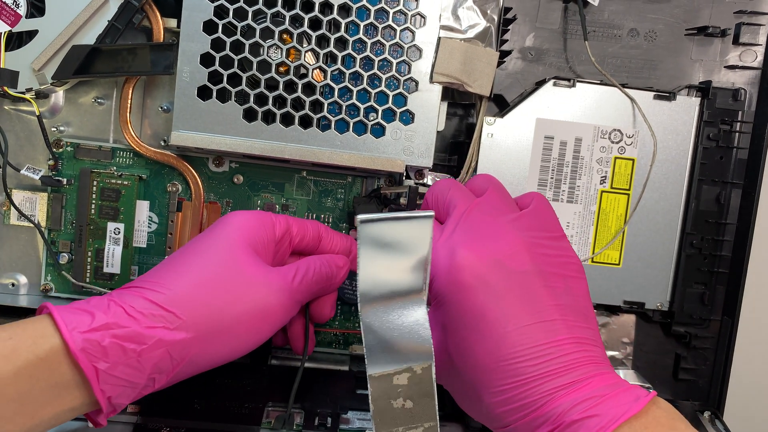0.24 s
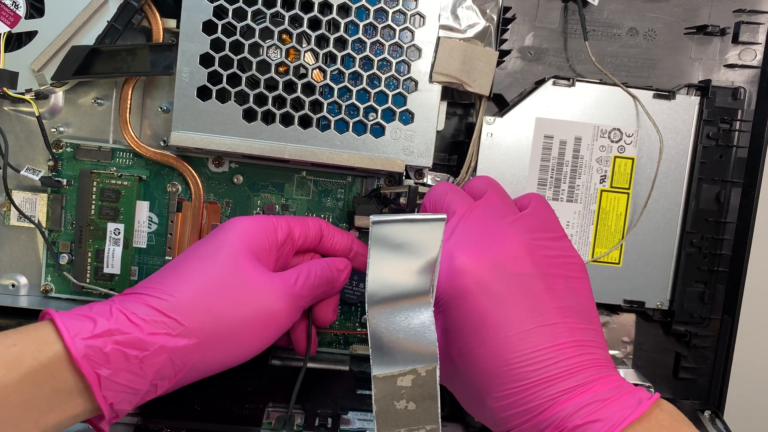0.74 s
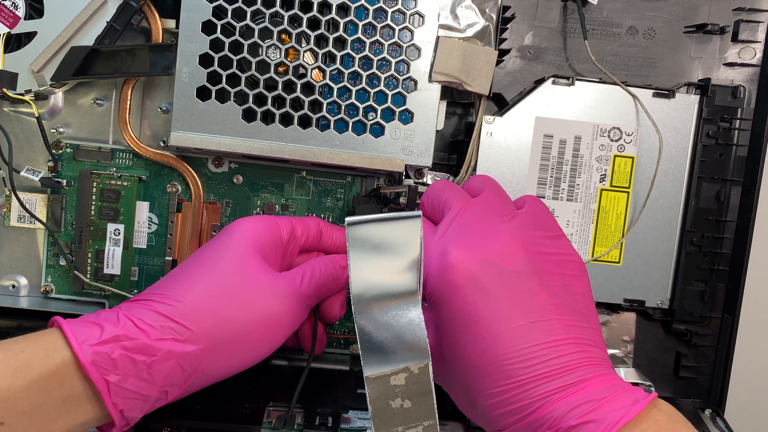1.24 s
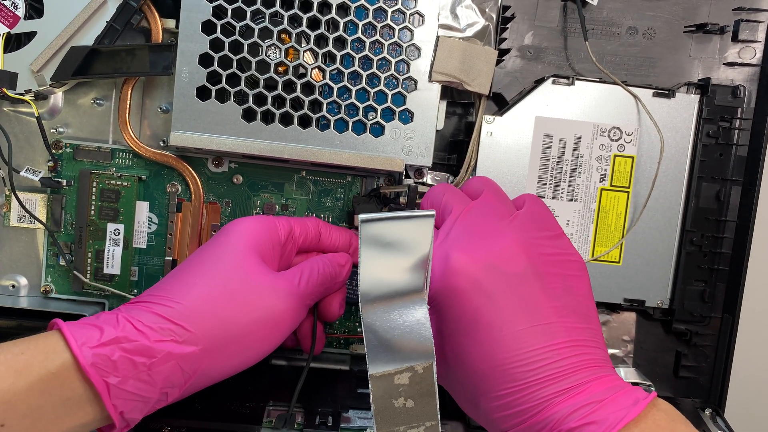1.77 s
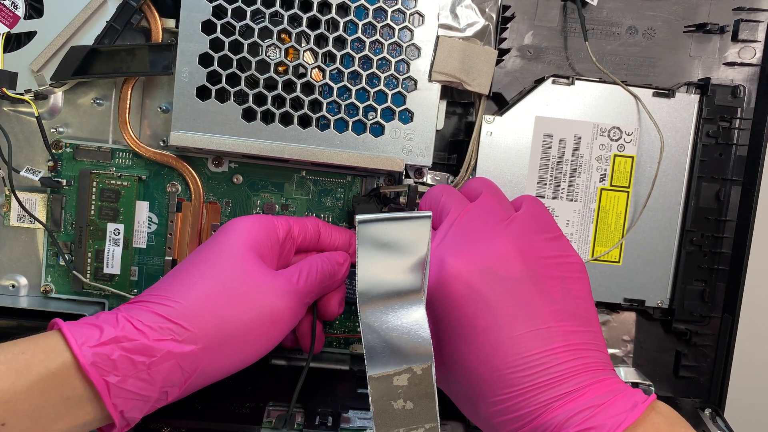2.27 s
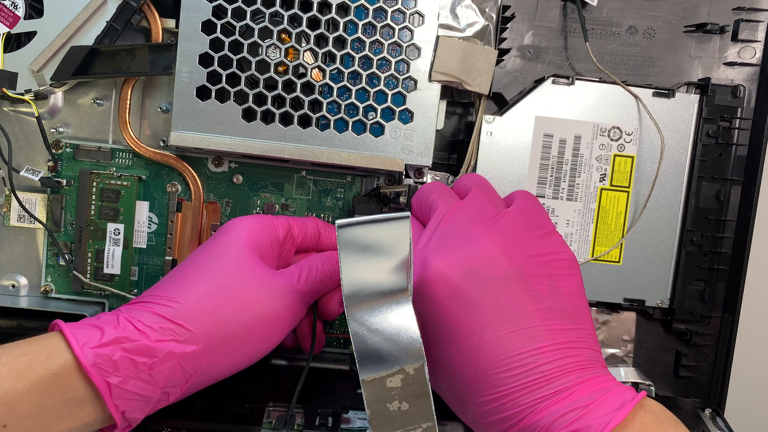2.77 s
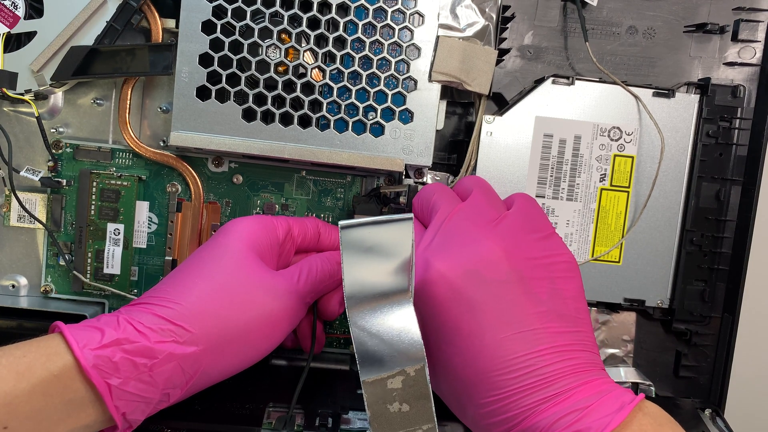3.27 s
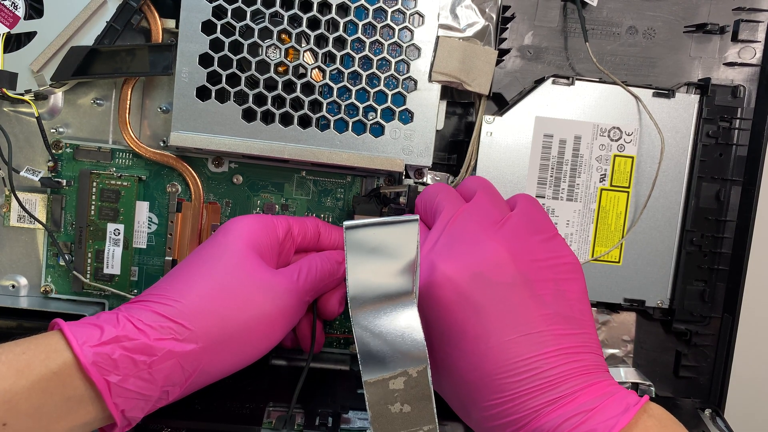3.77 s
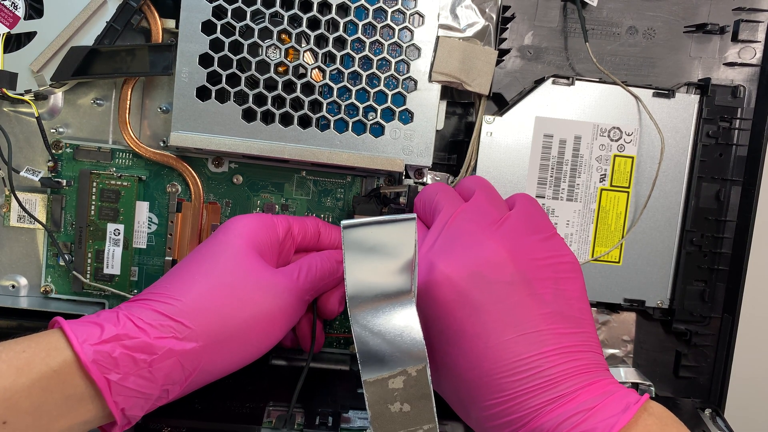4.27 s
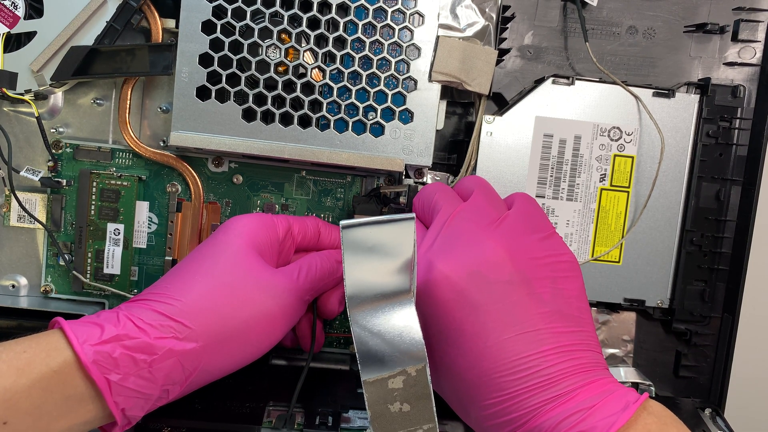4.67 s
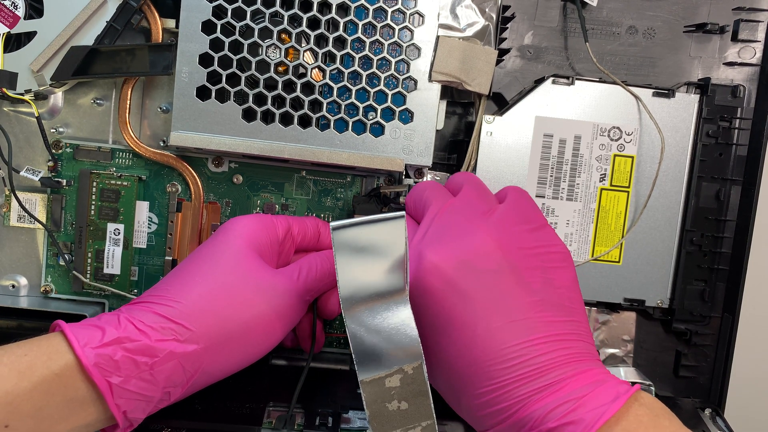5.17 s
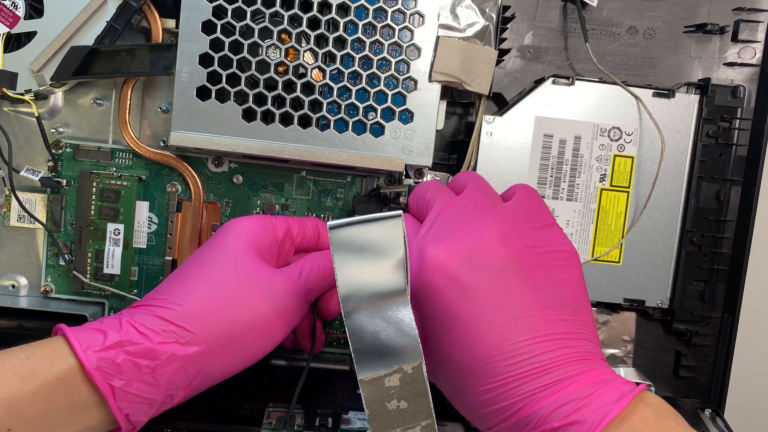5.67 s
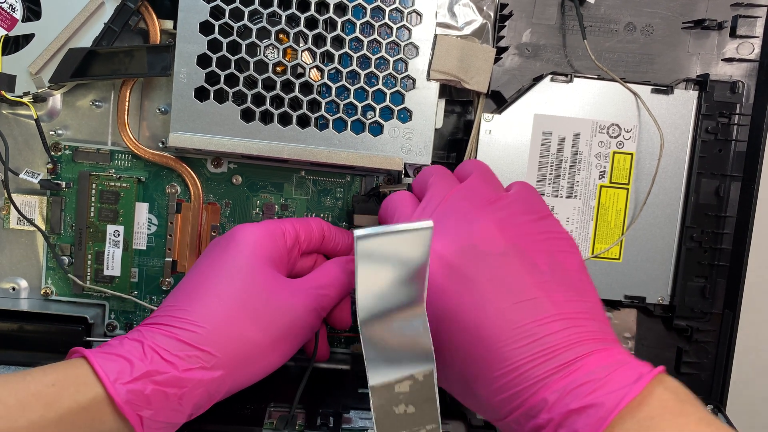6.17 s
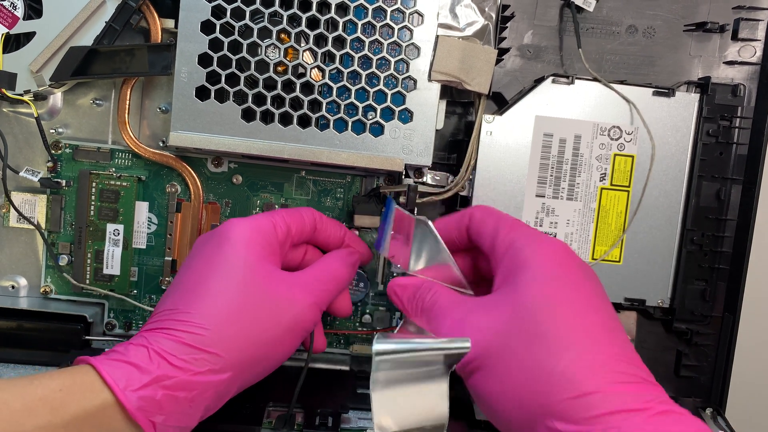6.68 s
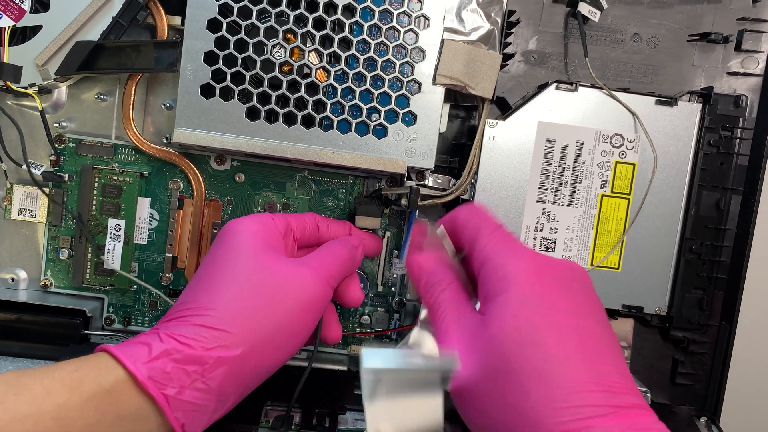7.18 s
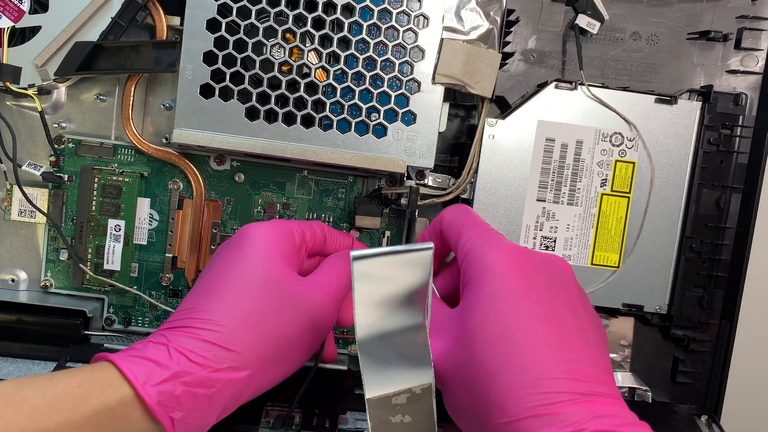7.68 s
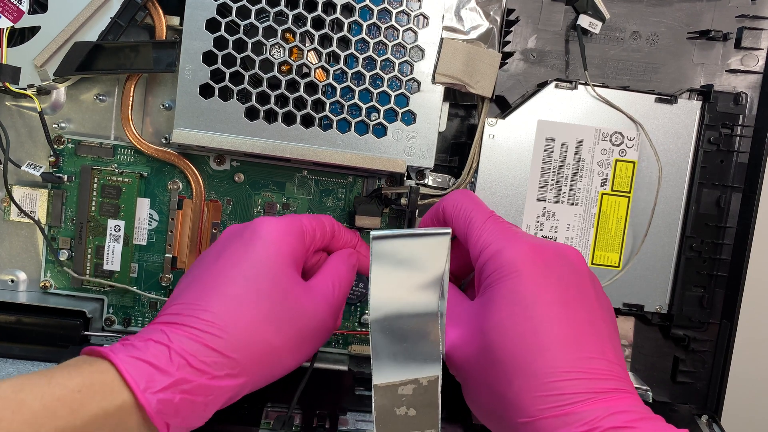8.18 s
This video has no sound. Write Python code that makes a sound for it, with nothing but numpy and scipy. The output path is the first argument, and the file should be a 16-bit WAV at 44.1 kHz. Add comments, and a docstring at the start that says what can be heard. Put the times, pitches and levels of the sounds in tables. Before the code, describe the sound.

Sparse plastic snaps, foil crackles and faint glove rubs over a low rumbling hum, ending in sharp clicks and knocks on thin metal.

```python
"""Low rumble, mains hum, a thin dying hiss and a drone sinking in pitch come first and lie behind it all.
Over them, gloved hands work a foil-covered ribbon cable in and out of its connector in an open computer.
Plastic and foil snap as clusters of tiny slips; gloves rub, squeak and rustle by friction.
The cable judders once in dull slips; its end knocks and rebounds on the sheet-metal chassis as ringing modes.
Filtered noise and sines make every layer; the open case and a small room reflect the handling."""
import sys
import numpy as np
from scipy import signal
from scipy.fft import rfft, irfft
from scipy.io import wavfile
from scipy.ndimage import uniform_filter1d

SR = 44100
rng = np.random.default_rng(int(sys.argv[2]) if len(sys.argv) > 2 else 0)


def dump_mix(stems):
    """Bounce the given channels to the path in sys.argv[1] as a 16-bit WAV at rate SR."""
    frames = np.atleast_2d(stems).T  # one column per channel
    limited = np.clip(frames, -1, 1)  # hard clip at full scale
    pcm = np.round(limited * 32767).astype(np.int16)
    wavfile.write(sys.argv[1], SR, pcm)


N = 371322
TIME = np.arange(N) / SR


def amp(db):
    """Turns dB into a gain factor."""
    return 10 ** (np.asarray(db) / 20)


def unit(x):
    """Scales to rms 1."""
    return x / np.sqrt(np.mean(x ** 2) + 1e-20)


def read(points, hz):
    """Joins (Hz, value) points on a log-frequency axis."""
    f, value = np.transpose(points)
    return np.interp(np.log(hz + 1), np.log(f + 1), value)


def add(mix, s, sound):
    """Mixes a sound in at s seconds."""
    part = mix[max(round(s * SR), 0):][:len(sound)]
    part += sound[:len(part)]


def decay(t, t60):
    """Dies away by 60 dB in t60 seconds."""
    return np.exp(-np.log(1000) * t / t60)


def noise(colour):
    """Steady noise of a given colour, rms 1."""
    gain = amp(read(colour, np.fft.rfftfreq(N, 1 / SR)))
    return unit(irfft(rfft(rng.standard_normal(N)) * gain, N))


def wander(rate_hz):
    """Slow random drift: noise rolled off above rate_hz, rms 1."""
    gain = 1 / (1 + (np.fft.rfftfreq(N, 1 / SR) / rate_hz) ** 4)
    return unit(irfft(rfft(rng.standard_normal(N)) * gain, N))


def ring(colour, body_db, fizz_db, size=2048):
    """Causal response of the touched part, tilted in body and fizz; its 2.5-5.5 kHz band has energy 1."""
    hz = np.fft.rfftfreq(size, 1 / SR)
    tilt_db = read([(1300, body_db), (2900, 0), (4900, 0), (7200, fizz_db), (14000, 1.88 * fizz_db)], hz)
    gain = amp(read(colour, hz) + tilt_db)
    gain /= np.sqrt(np.mean(gain ** 2 * (hz > 2500) * (hz < 5500)))
    # minimum phase: the ring starts at once
    log_gain = np.log(np.r_[gain, gain[-2:0:-1]] + 1e-6)
    return np.fft.ifft(np.exp(np.conj(signal.hilbert(log_gain)))).real


def crack(length, size=1024):
    """A quick cluster of tiny slips, with energy 1 spread evenly over the broad bands."""
    u = np.arange(size) / SR / max(length, 1 / SR)
    spectrum = rfft(rng.standard_normal(size) * u * np.exp(-u), 2 * size)
    smooth_power = uniform_filter1d(abs(spectrum) ** 2, size=70)
    return irfft(spectrum / np.sqrt(smooth_power + 1e-12))[:size]


# Colour of a snapping part. Each row: frequency in Hz, relative level in dB.
SNAP_COLOUR = [(120, -21), (350, -5), (620, -10), (1080, 5), (1600, -4), (2500, -5.5), (3600, 4), (4600, 0),
               (6500, -4), (9000, -11.5), (10300, -13), (12500, -22.5), (15500, -30)]


def snap(db, body_db, fizz_db, span=0.0045, shortest=0.0012, growth=0.0077):
    """A crack that rings the touched part; span, shortest and growth are in seconds."""
    length = shortest + growth * amp(db)  # a bigger snap takes longer to let go
    cracked = signal.fftconvolve(crack(length), ring(SNAP_COLOUR, body_db, fizz_db))
    return amp(db) * np.sqrt(span * SR) * cracked


# Snaps of the connector. Each row: start in seconds, level in dB, brightness in dB before body and fizz scaling.
CONNECTOR_SNAPS = [(0.365, -53.5, -4), (0.5456, -48.5, -3), (0.5725, -29, -3), (0.625, -50.5, -2.5),
                   (0.8837, -51, -1), (1.0658, -55, -9), (1.9264, -49, -4), (1.952, -32.5, 0),
                   (1.9638, -39.5, -4), (2.104, -48.5, -0.5), (2.236, -52, -3), (3.036, -56, -5),
                   (3.968, -44.5, -3), (4.2006, -37, 3.5), (4.4692, -51, -4), (4.6414, -59, -5),
                   (4.766, -54, -8), (5.88, -55, 5), (5.9094, -42.5, 3.5), (5.9235, -46.5, 0),
                   (6.0991, -51.5, -4), (6.229, -38.5, 4), (6.2317, -37, 0.5), (6.255, -32.5, 3.5),
                   (6.313, -51.5, -0.5), (6.9356, -24, 0.5), (6.9394, -34, -3.5), (7.2104, -27.5, 8),
                   (7.639, -41.5, 1)]
BODY_PER_BRIGHT, FIZZ_PER_BRIGHT = -1.57, 0.92  # a brighter snap has less body and more fizz


def connector_snaps():
    """The connector gives suddenly and rings the board under it."""
    out = np.zeros(N)
    for s, db, bright_db in CONNECTOR_SNAPS:
        add(out, s, snap(db, BODY_PER_BRIGHT * bright_db, FIZZ_PER_BRIGHT * bright_db))
    return out


# Snaps of the foil itself. Each row: start in seconds, level in dB, fizz in dB.
FOIL_SNAPS = [(0.689, -38, -6), (0.6976, -29, -5), (0.736, -40.5, 0), (0.84, -49.5, -2), (1.268, -57, 6),
              (6.8036, -41, -0.5), (7.051, -51, 10.5), (7.719, -46, 0.5)]


def foil_snaps(body_db=-5.5):
    """Foil cracks like the connector, always with a moderately reduced body."""
    out = np.zeros(N)
    for s, db, fizz_db in FOIL_SNAPS:
        add(out, s, snap(db, body_db, fizz_db))
    return out


# Uneven slips of the cable end along the connector. Each row: start in seconds, level in dB.
CABLE_SLIPS = [(1.4048, -50), (1.4292, -47), (1.434, -52), (1.451, -51), (1.461, -49.5), (1.488, -50),
               (1.4979, -51), (1.506, -53)]


def cable_slips(body_db=0, fizz_db=-22):
    """The juddering cable end catches and lets go in dull cracks with little fizz."""
    out = np.zeros(N)
    for s, db in CABLE_SLIPS:
        add(out, s, snap(db, body_db, fizz_db))
    return out


# Thin metal edges flicked by hard snaps. Each row: start in seconds, pitch in Hz, level in dB before the envelope.
PINGS = [(0.573, 10450, -26.5), (0.698, 6500, -28.5), (6.2313, 6420, -22.5), (6.2327, 7450, -25),
         (6.2555, 5300, -24.5), (7.2117, 10080, -17.5)]


def pings(rise_s=0.00048, t60_s=0.012):
    """A flicked metal edge rings for a few milliseconds at its own pitch."""
    t, out = np.arange(SR // 20) / SR, np.zeros(N)
    envelope = (1 - np.exp(-t / rise_s)) * decay(t, t60_s)
    for s, hz, db in PINGS:
        add(out, s, amp(db) * envelope * np.sin(2 * np.pi * hz * t))
    return out


# Blows of the cable end and their rebounds. Each row: start in seconds, level in dB, centre of its spectrum in Hz.
KNOCKS = [(4.201, -43, 1020), (6.938, -23.5, 1420), (6.9452, -42, 1100), (7.2114, -23, 790),
          (7.2148, -29.5, 655), (7.2205, -26.5, 453)]
# Modes of the sheet-metal chassis. Each row: frequency in Hz, relative level in dB, 60 dB decay in seconds.
CHASSIS_MODES = [(354, -9, 0.12), (407, -4.5, 0.21), (485, -2.5, 0.029), (603, -7, 0.079),
                 (673, -10.5, 0.08), (750, -11, 0.15), (844, -1.5, 0.069), (1020, 5, 0.035),
                 (1176, -2, 0.031), (1536, -9, 0.047), (2080, 3.5, 0.037)]


def knocks(rise_s=0.00045, slip_blow_db=3, slip_blow_hz=960):
    """A blow wakes mainly the chassis modes within about an octave of its own centre frequency."""
    t, out = np.arange(SR // 2) / SR, np.zeros(N)
    # each cable slip also nudges the chassis
    nudges = [(s, db + slip_blow_db, slip_blow_hz) for s, db in CABLE_SLIPS]
    for s, db, centre_hz in KNOCKS + nudges:
        for k, (hz, mode_db, t60) in enumerate(CHASSIS_MODES):
            share = np.exp(-np.log2(hz / centre_hz) ** 2)
            push = (-1) ** k  # neighbouring modes push opposite ways
            swing = push * np.sin(2 * np.pi * hz * t) * (1 - np.exp(-t / rise_s))
            add(out, s, share * amp(db + mode_db) * swing * decay(t, t60))
    return out


def friction(grains_per_s=700, spread_db=2.0, smooth=1.8, patchy_db=2.5):
    """Many tiny slips of uneven size over smooth noise, whose colour shifts as the contact moves."""
    sizes = amp(spread_db * np.minimum(rng.exponential(1, N), 4))
    slips = rng.standard_normal(N) * sizes * (rng.random(N) < grains_per_s / SR)
    z = signal.stft(unit(slips) + smooth * rng.standard_normal(N), nperseg=256)[2]
    blur = np.outer(np.hanning(7), np.hanning(7))
    patches = unit(signal.oaconvolve(rng.standard_normal(z.shape), blur, "same"))
    return signal.istft(z * amp(patchy_db * patches), nperseg=256)[1][:N]


def swell(x, start, end, overhang=.1):
    """One movement's worth of x; it creeps in before the start and dies away after the end."""
    lead = overhang * (end - start)
    part = x[round(start * SR):][:max(round((end - start + 2 * lead) * SR), 64)]
    return start - lead, unit(part * np.sin(np.linspace(0, np.pi, len(part))))


# Colour of rubbed foil and plastic. Each row: frequency in Hz, relative level in dB.
RUB_COLOUR = [(120, -20.5), (380, 14), (620, 2.5), (1050, 15.5), (1550, 5.5), (2100, 6.5), (2600, 2),
              (3600, 2.5), (5300, 0), (6900, -11), (10500, -24.5), (12500, -37), (15500, -41)]
# Short finger rubs on the cable. Each row: start in seconds, end in seconds, level in dB before the trim,
# brightness in dB before body scaling and fizz offset.
RUBS = [(0.358, 0.421, -62, -1.5), (0.529, 0.569, -66, -2), (0.681, 0.758, -61, 3.5),
        (0.85, 0.93, -56.5, 6), (0.864, 0.898, -58.5, -1), (0.965, 1.02, -58.5, 10), (1.031, 1.088, -65, 0),
        (1.387, 1.519, -72.5, -12), (2.053, 2.131, -67.5, 1), (2.167, 2.237, -64, 7),
        (5.169, 5.193, -64.5, -2), (5.484, 5.55, -69.5, 1), (6.184, 6.29, -65, -3.5),
        (6.545, 6.687, -65, 13.5), (6.718, 6.764, -55, 7.5), (7.215, 7.265, -64.5, -7.5),
        (7.27, 7.379, -56.5, 5.5), (7.374, 7.449, -64, 13), (7.625, 7.708, -57.5, 8),
        (7.684, 7.858, -67, 2.5), (8.042, 8.091, -60.5, 7.5)]
RUB_BODY_DB, RUB_FIZZ_DB, RUB_BODY_PER_BRIGHT = 2.5, 4, -1.1


def glove_rubs(trim_db=-1.27):
    """Gloves rub over foil and plastic: swells of friction coloured by the surface."""
    rubbing, out = friction(), np.zeros(N)
    for start, end, db, bright_db in RUBS:
        s, stroke = swell(rubbing, start, end)
        colour = ring(RUB_COLOUR, RUB_BODY_DB + RUB_BODY_PER_BRIGHT * bright_db, RUB_FIZZ_DB + bright_db)
        add(out, s, amp(db + trim_db) * signal.fftconvolve(stroke, colour))
    return out


# Rustle as the hand lifts the cable out and lays it back. Each row: time in seconds, level in dB before the trim.
RUSTLE_COURSE = [(6.05, -62), (6.57, -65.5), (6.73, -58), (6.83, -55.5), (7.0, -57.5), (7.32, -67),
                 (7.46, -59.5), (7.65, -72), (7.81, -70.5), (8.4, -65)]


def rustle(trim_db=-1, body_db=-4, fizz_db=14, clump_db=2.0, clump_hz=18):
    """Light, grainy friction of glove and foil that follows the moving hand and comes in clumps."""
    s, db = np.transpose(RUSTLE_COURSE)
    grains = friction(grains_per_s=460, spread_db=0.5, smooth=2.2, patchy_db=4.5)
    grainy = unit(signal.oaconvolve(grains, ring(RUB_COLOUR, body_db, fizz_db))[:N])
    level = amp(np.interp(TIME, s, db) + trim_db + clump_db * wander(clump_hz))
    return level * (TIME > s[0]) * (TIME < s[-1]) * grainy


def foil_crackle(rubbing, body_db=-4, fizz_db=3):
    """The foil gives in tiny separate crackles, which follow the strength of the rubbing that bends it."""
    per_s, share_db, spread_db, above_hz = 150, -4.5, 3, 2500
    treble = signal.lfilter(*signal.butter(2, above_hz, "highpass", fs=SR), rubbing)
    effort = np.sqrt(abs(uniform_filter1d(treble ** 2, size=600)))
    sizes = amp(spread_db * np.minimum(rng.exponential(1, N), 4))
    pops = (rng.random(N) < per_s / SR) * sizes
    crackles = unit(signal.oaconvolve(pops, ring(SNAP_COLOUR, body_db, fizz_db))[:N])
    return amp(share_db) * effort * crackles


# The cable bends and scuffs against an edge. Each row: start in seconds, end in seconds, level in dB,
# resonance at mid-scuff in Hz, bandwidth in Hz.
FLEXES = [(0.862, 0.887, -50.5, 3450, 900), (0.883, 0.89, -51, 6900, 1400),
          (6.711, 6.798, -48.5, 1600, 1200), (6.724, 6.77, -46, 1980, 1000),
          (6.726, 6.754, -51.5, 5070, 600), (7.272, 7.335, -50.5, 1650, 1100),
          (7.29, 7.298, -49, 4600, 350), (7.308, 7.319, -45.5, 2050, 230), (7.326, 7.36, -48, 1490, 1150),
          (7.659, 7.686, -49, 6830, 800), (7.8, 7.83, -57, 1410, 550), (8.211, 8.23, -53, 1800, 1990)]


def cable_flexes(sag_hz_per_s=3800):
    """Friction heard through one resonance of the bent cable, which sinks as the bend relaxes."""
    rubbing, out = friction(grains_per_s=750, smooth=0.93, patchy_db=-0.5), np.zeros(N)
    for start, end, db, hz, width_hz in FLEXES:
        s, scuff = swell(rubbing, start, end)
        from_middle = s + np.arange(len(scuff)) / SR - (start + end) / 2
        # shift the moving resonance down to 0 Hz, low-pass, and shift it back
        turn = np.exp(2j * np.pi * np.cumsum(hz - sag_hz_per_s * from_middle) / SR)
        band = turn * signal.lfilter(*signal.butter(2, width_hz / 2, fs=SR), scuff / turn)
        add(out, s, amp(db) * unit(band.real))
    return out


# Thin squeaks of glove on foil, one list for each slide. Each row: time in seconds, mean slip rate in Hz, level in dB.
SQUEAK_SLIDES = [
    [(1.03, 1275, -70), (1.07, 1350, -64), (1.125, 1272, -70), (1.17, 1238, -69), (1.24, 1125, -70),
     (1.30, 970, -80)],
    [(6.11, 970, -73), (6.21, 915, -77), (6.53, 895, -76)],
]
# Squeak harmonics that the foil radiates. Each row: multiple of the slip rate, relative level in dB.
SQUEAK_HARMONICS = [(7, 0), (8, -2), (9, -8)]


def squeaks(jitter=0.006, jitter_hz=250, flutter_db=-2.5, flutter_hz=22):
    """Fast stick-slip whose upper harmonics alone are radiated, each fading in and out on its own."""
    out, unsteady = np.zeros(N), 1 + jitter * wander(jitter_hz)
    gains = [amp(db + flutter_db * wander(flutter_hz)) for _, db in SQUEAK_HARMONICS]
    for slide in SQUEAK_SLIDES:
        s, rate, db = np.transpose(slide)
        inside = (TIME > s[0]) & (TIME < s[-1])
        t = TIME[inside]
        turns = np.cumsum(np.interp(t, s, rate) * unsteady[inside]) / SR
        partials = sum(gain[inside] * np.sin(2 * np.pi * k * turns)
                       for (k, _), gain in zip(SQUEAK_HARMONICS, gains))
        add(out, s[0], amp(np.interp(t, s, db)) * unit(partials))
    return out


# Decay of the small room. Each row: frequency in Hz, 60 dB decay in seconds.
ROOM_DECAY = [(300, 0.84), (1000, 0.22), (8000, 0.12)]


def space(x, case_db=-12, case_t60=0.065, room_db=-20, delay=0.0028):
    """Quick reflections from the open case and desk, with a faint room tail, as decaying noise."""
    near, far = rng.standard_normal((2, SR // 2))
    near *= decay(np.arange(len(near)) / SR, case_t60)
    hz, t, z = signal.stft(far, SR, nperseg=256)
    z = z * decay(t, read(ROOM_DECAY, hz)[:, None])
    far = signal.istft(z, SR, nperseg=256)[1][:len(near)]
    tail = amp(case_db) * near / np.linalg.norm(near) + amp(room_db) * far / np.linalg.norm(far)
    out = x.copy()
    add(out, delay, signal.fftconvolve(x, tail))
    return out


# Course of the low drone. Each row: time in seconds, level in dB before the trim.
DRONE_COURSE = [(0.0, -56), (0.59, -35.5), (0.82, -34), (0.87, -50), (2.62, -44.5), (3.3, -34), (4.01, -51),
                (5.04, -35.5), (6.4, -45.5), (8.42, -43.5)]


def drone(start_hz=60.87, sag_hz_per_s=0.99, trim_db=-1, drift_rad=0.27):
    """A low sine that sinks slowly in pitch, its phase drifting at random."""
    s, db = np.transpose(DRONE_COURSE)
    turns = np.cumsum(start_hz - sag_hz_per_s * TIME) / SR
    tone = unit(np.sin(2 * np.pi * turns + drift_rad * wander(2.4)))
    return amp(np.interp(TIME, s, db) + trim_db) * tone


# Lasting hum tones. Each row: frequency in Hz, mean level in dB.
HUM_TONES = [(92, -54), (120, -55)]


def hum(waver_db=2, drift_rad=0.85):
    """Low sines that waver slowly in level and phase."""
    out = np.zeros(N)
    for hz, db in HUM_TONES:
        tone = unit(np.sin(2 * np.pi * hz * TIME + drift_rad * wander(2.15)))
        out += amp(db + waver_db * wander(1.8)) * tone
    return out


# Colour of the thin hiss. Each row: frequency in Hz, relative level in dB.
HISS_COLOUR = [(1900, -6), (2300, -1.5), (2800, -8.5), (10000, -13), (13000, -25)]


def hiss(start_db=-63, fade_db_per_s=6.5):
    """Thin noise that dies away from the start."""
    return amp(start_db - fade_db_per_s * TIME) * noise(HISS_COLOUR)


# Colour of the building rumble. Each row: frequency in Hz, relative level in dB.
RUMBLE_COLOUR = [(15, 3), (30, 3), (45, -6.5), (57, -5), (74, -17), (92, -14.5), (115, -12.5), (135, -24.5),
                 (170, -28), (230, -59), (400, -70)]


def rumble(mean_db=-35, swell_db=1):
    """Low noise of the building, gently swelling."""
    return amp(mean_db + swell_db * wander(2.2)) * noise(RUMBLE_COLOUR)


# Colour of the faint air. Each row: frequency in Hz, relative level in dB.
AIR_COLOUR = [(88, -30), (150, -1.5), (520, -10.5), (662, -14), (2650, -23), (14200, -31.5), (16000, -34)]


def air(level_db=-60):
    """Faint, steady broadband noise."""
    return amp(level_db) * noise(AIR_COLOUR)


def scene():
    """The handling in its room, over the background."""
    rubbing = glove_rubs() + rustle()
    snapping = connector_snaps() + foil_snaps() + cable_slips() + pings()
    sliding = rubbing + foil_crackle(rubbing) + cable_flexes() + squeaks()
    handling = snapping + knocks() + sliding
    background = drone() + hum() + hiss() + rumble() + air()
    return (space(handling) + background)[None]


def record(dry, edge_hz=16150):
    """A steep low-pass without delay takes off the top of the treble."""
    low_pass = signal.firwin(255, edge_hz, window=("kaiser", 9), fs=SR)
    return signal.oaconvolve(dry, low_pass[None], "same")


dry = scene()
out = record(dry)
dump_mix(out)
```